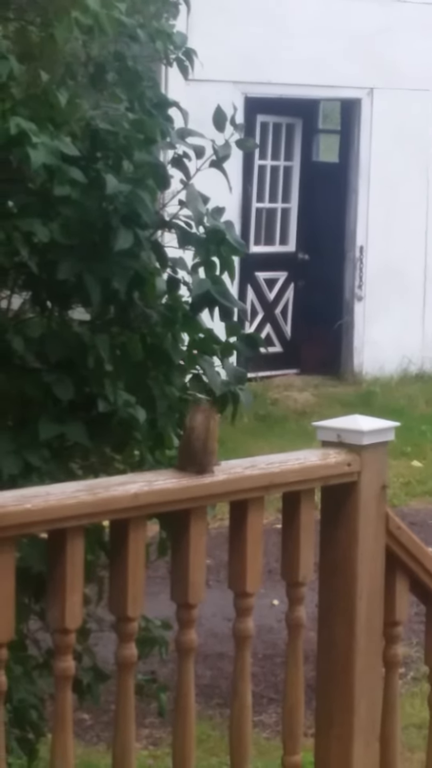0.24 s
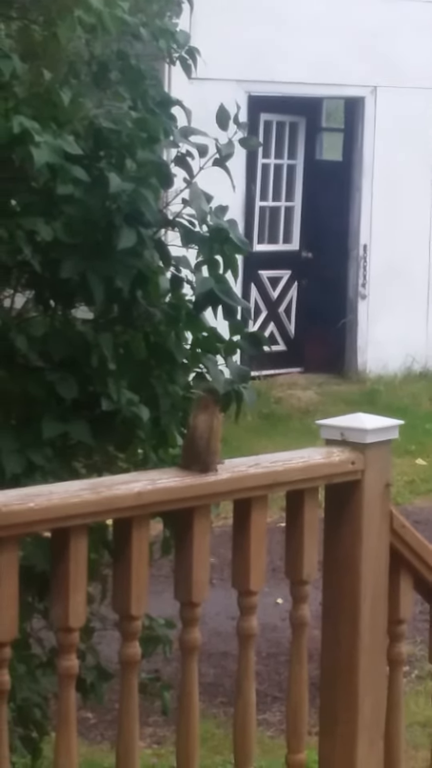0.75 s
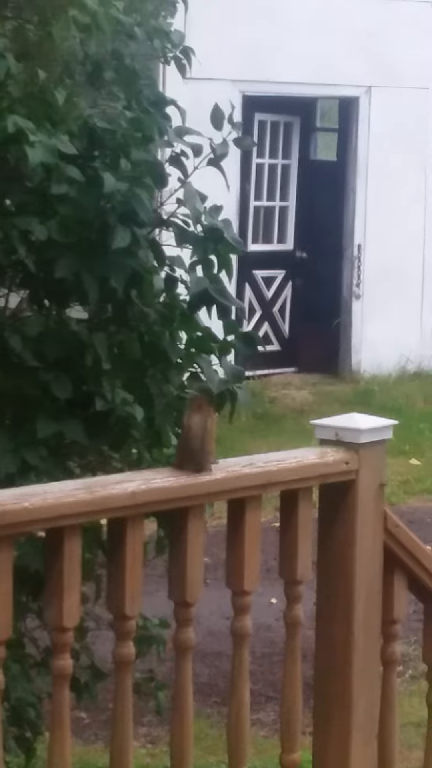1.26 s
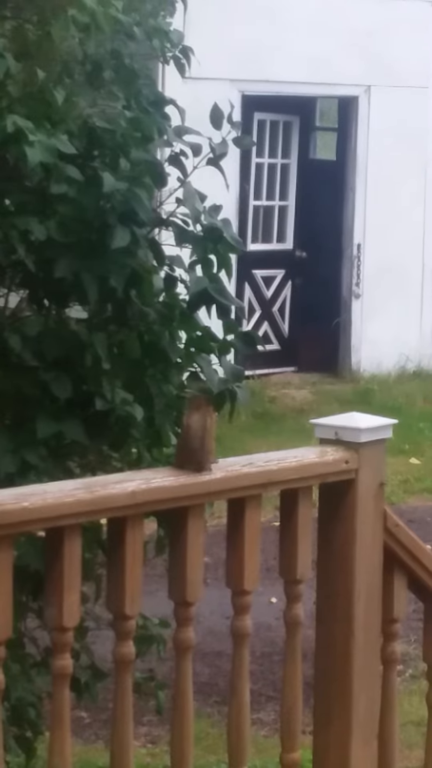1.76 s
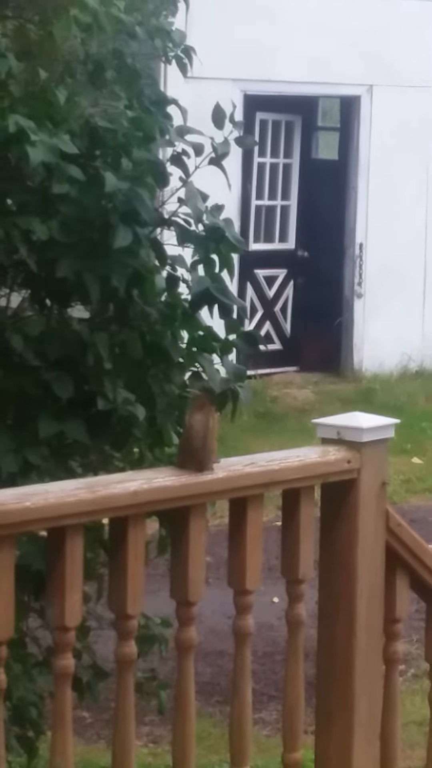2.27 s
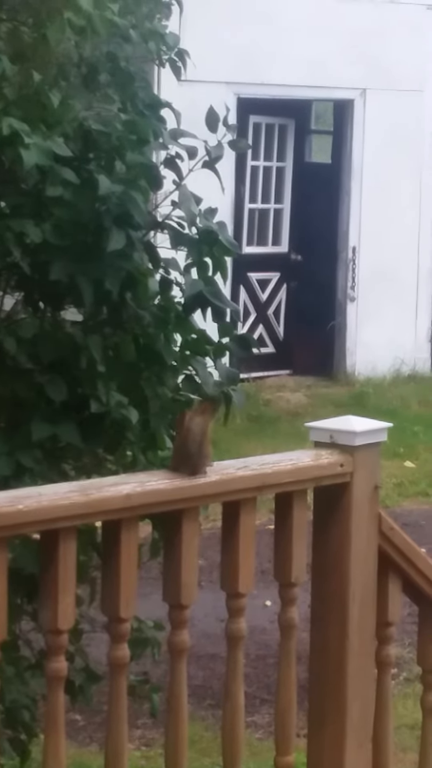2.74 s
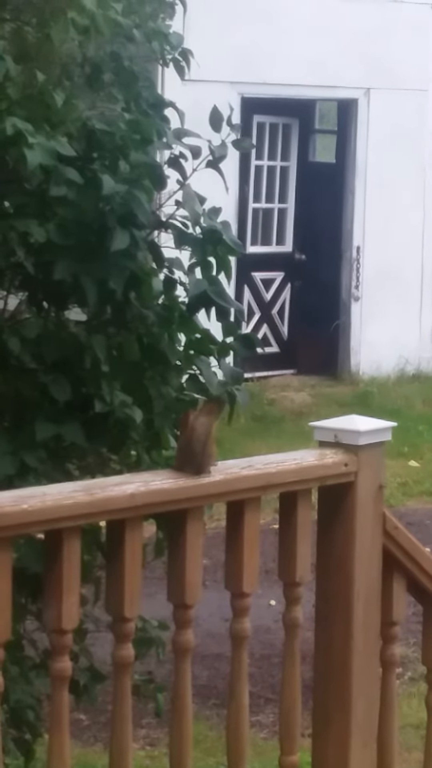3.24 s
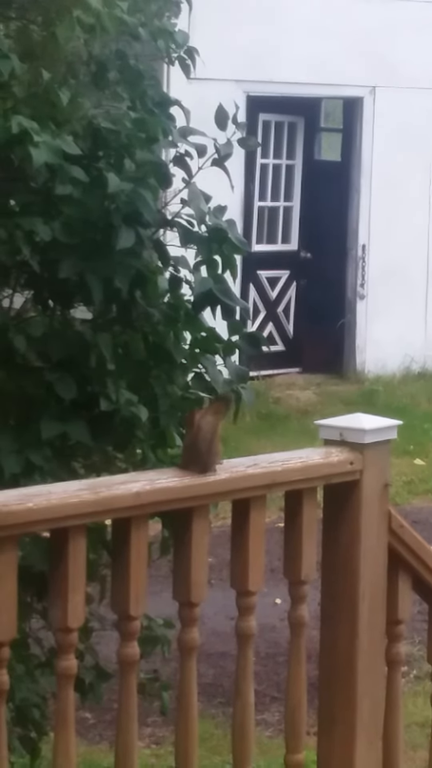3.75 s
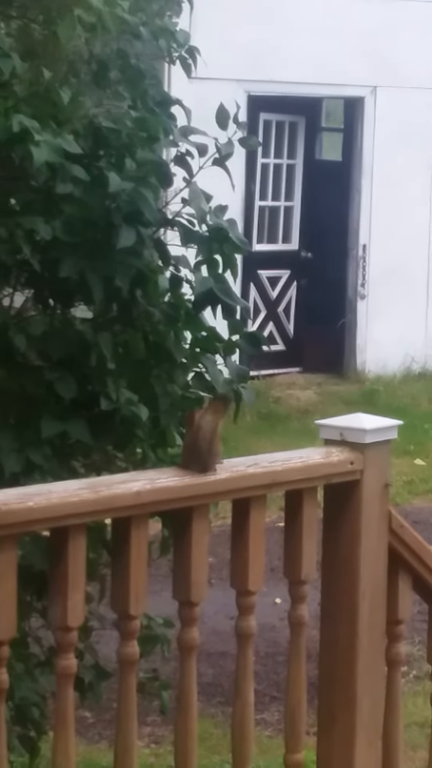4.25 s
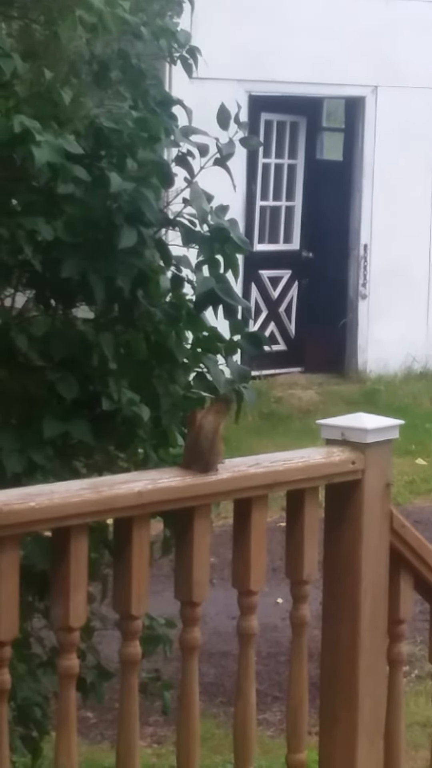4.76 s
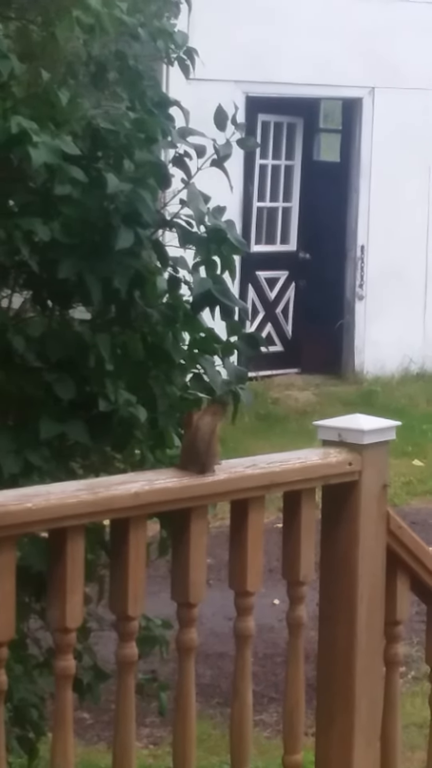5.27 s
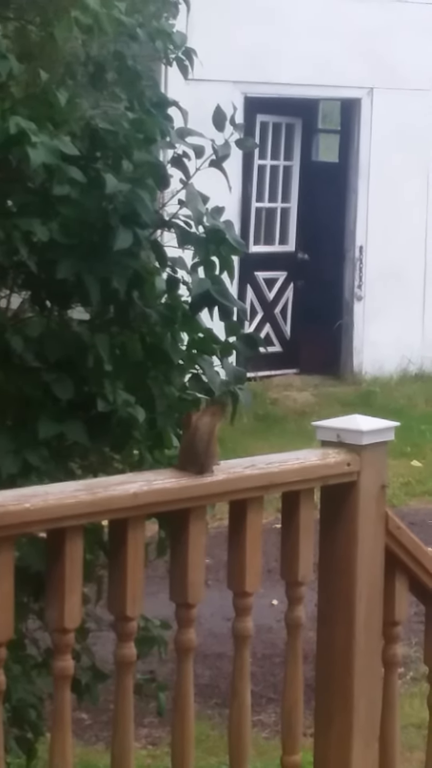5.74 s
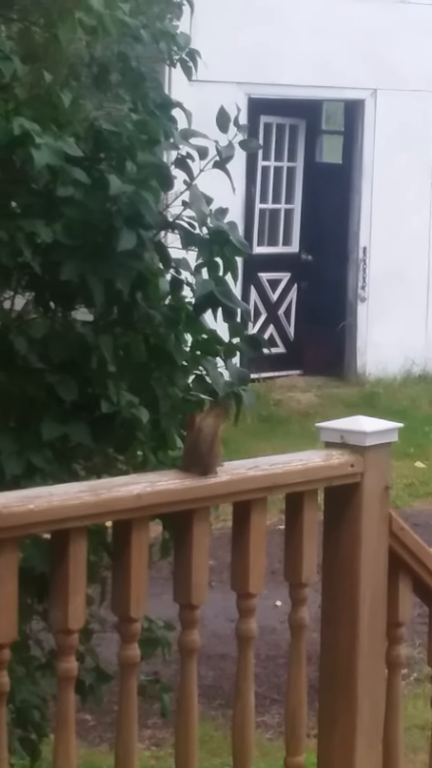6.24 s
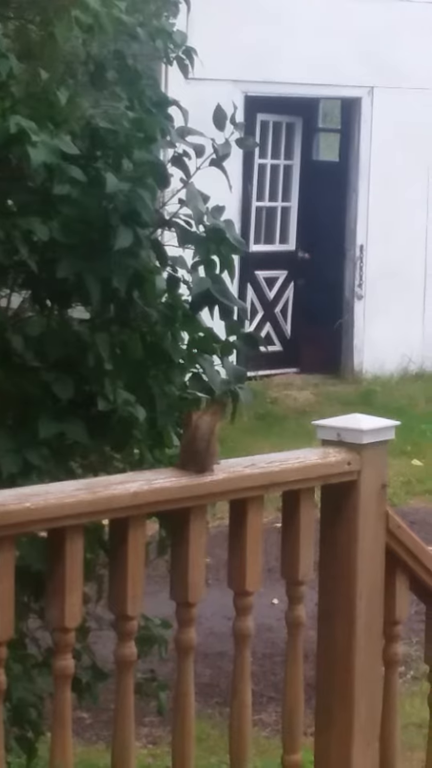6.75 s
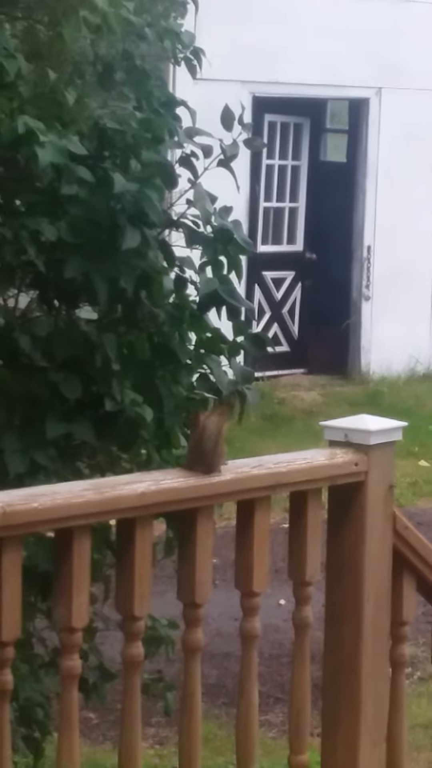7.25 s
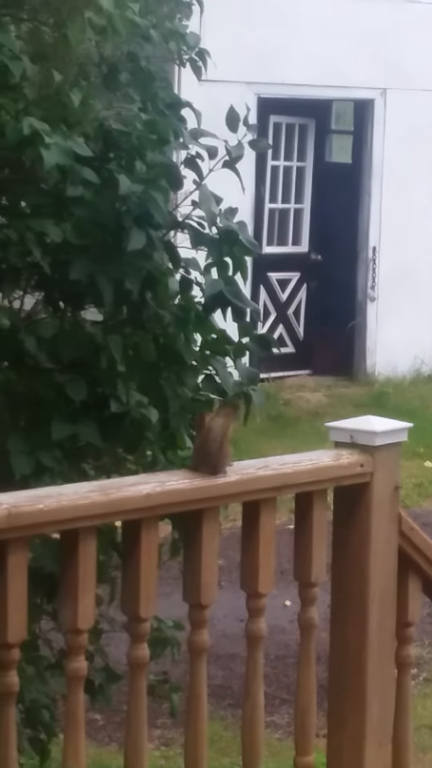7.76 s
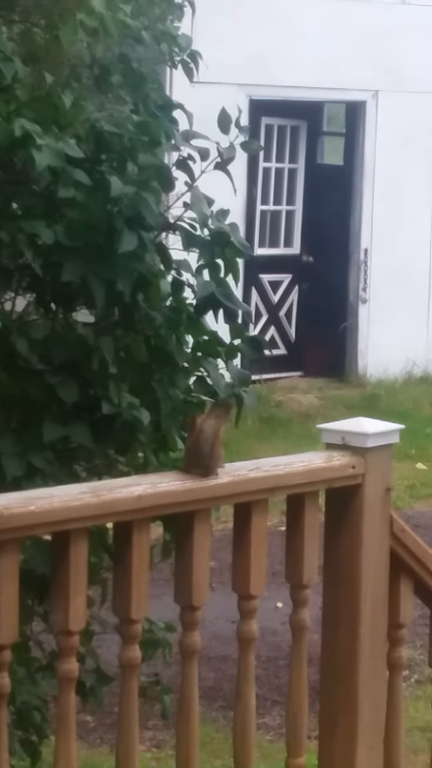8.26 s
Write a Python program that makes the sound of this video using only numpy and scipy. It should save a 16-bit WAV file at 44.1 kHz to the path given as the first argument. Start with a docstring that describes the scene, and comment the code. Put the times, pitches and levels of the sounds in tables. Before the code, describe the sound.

A small squirrel scolds outdoors by a wooden porch for the whole eight seconds or so. Its chirps are very short, high, arching whistles with a slight rasp, coming about three times a second at a fairly even level, each with a brief echo off the rail and house walls. One softer, lower squeak slips in at 0.6 seconds. From about 1.1 seconds, a quick, hoarse, breathy chuff follows some of the chirps. Sharp, dry knocks sound close to the microphone at about 0.7, 1.5 and 2.4 seconds, with the loudest at 3 seconds and a smaller one just after. They then thin out to light taps and scuffs while the chirping runs on to the end. Underneath, quiet and constant, are a high insect shimmer that gently swells, soft garden air and a faint low machine hum.

```python
"""A garden bed opens the scene and holds throughout: soft air, a high insect shimmer, a faint machine hum.
At once a small squirrel scolds from a wooden porch rail, in arched whistles that break upward and sag.
One softer squeak slips in, and from about a second on a hoarse, breathy chuff follows some of the chirps.
Sharp, close knocks peak around three seconds, then thin out to light taps and scuffs.
The scolding runs on to the end, with the porch and the house walls throwing each call back."""
import sys
import numpy as np
from scipy import signal
from scipy.fft import rfft, irfft
from scipy.io import wavfile

SR = 44100
rng = np.random.default_rng(int(sys.argv[2]) if len(sys.argv) > 2 else 0)


def put_to_file(sound):
    """Save the sound as 16-bit audio at rate SR, in the file named by the first command-line argument."""
    columns = np.atleast_2d(sound).T  # one column per channel
    safe = np.clip(columns, -1, 1)
    whole_steps = np.round(safe * 32767)
    wavfile.write(sys.argv[1], SR, whole_steps.astype(np.int16))


N = 374837

# tone of the garden air: (frequency [Hz], relative level [dB])
AIR_SPECTRUM = [(20, -40), (40, -16), (58, -3.5), (82, 7), (105, -1.5), (170, -6.5), (300, -11.5),
                (500, -16.5), (1000, -26), (2000, -35.5), (3500, -26), (8000, -23.5), (11000, -32),
                (16000, -27)]
# tone of the insect chorus: (frequency [Hz], relative level [dB])
INSECT_SPECTRUM = [(3700, -29.5), (4400, -15), (4800, -7), (5050, -1.5), (5350, 2.5), (5550, -5),
                   (5750, -9), (6500, -15.5), (7200, -20.5), (9000, -47)]
# partials of the machine hum: (frequency [Hz], rms level [dB])
HUM_PARTIALS = [(83.5, -80), (119.7, -67.5), (240, -81), (303, -75)]
# slaps off rail, posts and walls: (delay [s], gain [dB])
ECHO_TAPS = [(.0066, -12), (.0083, -13), (.0101, -6), (0.0118, -9), (.0218, -17.5), (0.0273, -11),
             (.0412, -13.5), (.102, -25)]
# ring-out of the porch: (frequency [Hz], t60 [s])
PORCH_DECAY = [(200, 0.51), (1000, 0.18), (3300, 0.21), (6300, 0.31), (13000, 0.28)]
# knock and scuff cues: (time [s], snap level [dB], body level [dB], body tuning [ratio],
# snap tuning [ratio], contact time [ratio])
KNOCK_CUES = [(0.2528, -49, -47.5, 0.53, 1.07, 1.55), (.476, -41, -55, 0.98, 0.87, 1.2),
              (0.6881, -24, -27.5, 1.065, 0.86, 0.53), (1.017, -53.5, -62.5, 0.84, 1.03, 1.9),
              (1.543, -30, -35, 1.054, 0.84, 0.54), (1.652, -40, -54.5, 0.68, 1.11, 0.79),
              (2.3447, -32.5, -70, 1.04, 1.05, 0.81), (2.417, -46.5, -58, 0.91, 1, 1.6),
              (2.4309, -35, -39, 0.66, 1.01, 0.9), (2.82, -50.5, -49, 1.28, 0.94, 3.2),
              (3.0209, -21.5, -35, .94, .97, 0.4), (3.0817, -34.5, -39, 1.14, 0.41, 0.39),
              (3.352, -34, -43.5, 1.28, 1.06, 0.62), (3.467, -54.5, -54.5, 1.12, 1.36, 1.3),
              (3.884, -61.5, -58, 1.3, 0.78, 1.8), (4.059, -41.5, -45.5, 1.24, 0.93, 1.8),
              (4.397, -58, -74, 0.57, 0.54, 1.2), (4.543, -48, -58, 1.9, 0.71, 1.4),
              (5.07, -43.5, -49.5, 1.72, 1.4, .62), (5.49, -46, -51.5, .63, 0.47, 2.74),
              (6.7236, -49.5, -49, 0.6, 0.85, 1.9), (8.255, -48, -55, 0.63, 1.23, .91)]
# tone of a knock's snap before tuning: (frequency [Hz], relative level [dB])
SNAP_SPECTRUM = [(70, -57), (300, -13), (800, -9.5), (1500, -4), (2300, -7), (3100, -1.5), (4000, 5.5),
                 (5200, -0.5), (7000, -6), (11000, -27)]
# tone of a knock's treble crack: (frequency [Hz], relative level [dB])
CRACK_SPECTRUM = [(3000, -71), (6500, -19), (8300, 11), (10500, -13.5), (13000, 0.5), (16000, -6.5)]
# modes of the knocked body before tuning: (frequency [Hz], relative level [dB], t60 [s])
BODY_MODES = [(243.6, -13, 0.081), (342.4, -16, 0.15), (513, -4, 0.056), (673.7, -3.5, 0.073),
              (695, 9.5, 0.021), (824, -11, 0.15), (902, -5, 0.022), (1062, -7, 0.042), (1378, 1, 0.025),
              (1578, -6.5, 0.025)]
# chuff cues: (time [s], length [s], level [dB], relative hiss level [dB])
CHUFF_CUES = [(1.101, 0.033, -39.5, -15), (1.476, 0.029, -40, 1), (2.258, 0.039, -40.5, -12),
              (2.912, 0.036, -38, -0.5), (3.599, 0.039, -37, -2.5), (4.46, 0.037, -38.5, 0),
              (5.224, 0.037, -38.5, -1), (5.959, 0.03, -39, -0.5), (6.403, 0.038, -38, -2),
              (7.625, 0.036, -40, 0.5)]
# tone of the throat in a chuff: (frequency [Hz], relative level [dB])
THROAT_SPECTRUM = [(300, -24.5), (600, -28.5), (900, -17.5), (1400, -36.5), (2300, -19), (2850, -0.5),
                   (3600, 1), (4500, -14), (7000, -9.5), (10800, -28.5), (16000, -36)]
# air hissing past the teeth: (frequency [Hz], relative level [dB])
TEETH_SPECTRUM = [(2000, -17.5), (4500, -15), (8000, -6), (10800, -7), (12000, -1), (12700, 4.5),
                  (14200, -12.5), (16000, -8)]
# chirp cues: (time [s], length [s], top pitch [Hz], level [dB])
CHIRP_CUES = [ (0.022, 0.043, 6605, -29.5), (.3803, .038, 6700, -28), (0.8715, 0.037, 6660, -27.5),
              (1.432, 0.04, 6660, -29.5), (1.854, 0.056, 6653, -29), (2.1067, 0.028, 6675, -27.5),
              (2.5434, 0.043, 6714, -27.5), (2.874, 0.032, 6715, -28), (3.253, 0.042, 6740, -28),
              (3.563, .034, 6740, -26.5), (4.02, 0.041, 6780, -26.5), (4.428, .031, 6720, -27.5),
              (4.8547, 0.038, 6790, -25.5), (5.1911, 0.031, 6510, -26.5), (5.5987, 0.039, 6614, -25.5),
              (5.9183, .032, 6640, -27), (6.361, 0.036, 6650, -25.5), (6.769, .035, 6650, -25),
              (7.001, 0.032, 6780, -26.5), (7.3047, 0.039, 6646, -27), (7.582, .035, 6670, -27.5),
              (7.883, 0.033, 6580, -27), (8.1448, .039, 6760, -27)]


def amp(db):
    """Decibels to gain."""
    return 10 ** (np.asarray(db) / 20)


def unit(x):
    """Scales to rms 1."""
    return x / np.sqrt(np.mean(x ** 2) + 1e-20)


def curve_at(points, hz):
    """Reads a curve along a log-frequency axis."""
    f, value = np.transpose(points)
    return np.interp(np.log(hz + 1), np.log(f + 1), value)


def add(mix, start_s, sound):
    """Drops a sound into the mix at its cue."""
    part = mix[max(round(start_s * SR), 0):][:len(sound)]
    part += sound[:len(part)]


def noise(spectrum, size, tuning=1):
    """Noise coloured by a spectrum, transposed by a ratio."""
    hz = np.fft.rfftfreq(size, 1 / SR)
    return unit(irfft(rfft(rng.standard_normal(size)) * amp(curve_at(spectrum, hz / tuning)), size))


def drift(rate_hz, size):
    """Smooth random modulation of rms 1, rolling off above the given rate."""
    hz = np.fft.rfftfreq(size, 1 / SR)
    return unit(irfft(rfft(rng.standard_normal(size)) * np.exp(-(hz / rate_hz) ** 2) * (hz > 0), size))


def garden(air_db=-63, insects_db=-55.5, throb_db=1.4, swell_db=2.8):
    """The bed: still air, an insect chorus that throbs and swells, a wavering machine hum."""
    t = np.arange(N) / SR
    shimmer = amp(insects_db + throb_db * drift(82, N) + swell_db * drift(1.3, N))
    insects = shimmer * noise(INSECT_SPECTRUM, N)
    hum = sum(amp(db) * np.sqrt(2) * np.sin(2 * np.pi * hz * t + 0.19 * drift(2.0, N))
              for hz, db in HUM_PARTIALS)
    return amp(air_db) * noise(AIR_SPECTRUM, N) + insects + hum


def porch(send, build_s=0.0047, yard_db=-17, yard_t60=0.44, tails=3):
    """Reverb: dense porch scatter and a faint yard tail; slow crossfades keep the paths shifting."""
    wet = np.zeros(N)
    build = 1 - np.exp(-np.arange(SR) / SR / build_s)
    for k in range(tails):
        hz, t, bands = signal.stft(rng.standard_normal(SR), SR, nperseg=256)
        decay = amp(-60 * t / curve_at(PORCH_DECAY, hz)[:, None]) + amp(yard_db - 60 * t / yard_t60)
        tail = signal.istft(bands * decay, SR, nperseg=256)[1][:SR] * build
        crossfade = np.cos(np.pi * (np.arange(N) / SR / 2 + k / tails)) * np.sqrt(2 / tails)
        wet += signal.fftconvolve(send * crossfade, tail / np.linalg.norm(tail))[:N]
    return wet


def echoes(send):
    """Early reflections off the nearby woodwork and walls."""
    wet = np.zeros(N)
    for delay, db in ECHO_TAPS:
        add(wet, delay, amp(db) * send)
    return wet


def ticks(per_s=1.0, level_db=-65, spread_db=2.5):
    """A sprinkle of tiny knocks at random moments, each with its own weight and pitch."""
    track = np.zeros(N)
    for when, strength, octave in rng.uniform(-1, 1, (round(per_s * N / SR), 3)):
        db = level_db + spread_db * strength
        add(track, abs(when) * N / SR, knock(db, db, 2 ** octave, snap_tuning=0.83, contact=1.2))
    return track


def knock(snap_db, body_db, body_tuning, snap_tuning, contact, body_rise_s=0.0016, size=8192):
    """A snap and a bright crack over a hollow ring; longer contact softens the blow into a scuff."""
    t = np.arange(size) / SR
    stretched = t / contact
    attack = 1 - np.exp(-stretched / contact ** 2 / 0.0001)
    spike = 1 + np.exp(-stretched / 0.00089)  # the first instant of contact hits hardest
    snap = amp(snap_db - 60 * stretched / 0.07) * noise(SNAP_SPECTRUM, size, snap_tuning)
    crack_db = snap_db - 11.5 + 11 * np.log2(body_tuning)  # higher knocks crack more
    crack = amp(crack_db - 60 * stretched / 0.051) * noise(CRACK_SPECTRUM, size)
    body = sum(amp(body_db + db - 60 * t / t60)
               * np.sin(2 * np.pi * (hz * body_tuning * t + rng.random()))
               for hz, db, t60 in BODY_MODES)
    return (snap + crack) * attack * spike + body * (1 - np.exp(-t / body_rise_s))


def chuff(length, level_db, hiss_db, rough_db=3.5, squeak_hz=890, wheeze_hz=1150, size=4096):
    """Breath through a hoarse throat and past the teeth, with a faint rising squeak and a late wheeze."""
    progress = np.arange(size) / SR / length
    throat_env = np.interp(progress, [0, 0.22, 0.6, 0.85, 1.1], [0, 0.5, 1, 1, 0.054])
    teeth_env = np.interp(progress, [0, 0.2, 0.65, 1.1], [0, 0.49, 1, 0])
    wheeze_env = np.exp(-((progress - 0.75) / 0.14) ** 2)
    waver = 1 + 0.056 * drift(330, size)
    scoop = 1 - 0.407 * np.exp(-progress / 0.2505)
    phase = 2 * np.pi * np.cumsum(squeak_hz * scoop * waver) / SR
    squeak = amp(-14) * teeth_env * (np.sin(phase) + amp(-2) * np.sin(2 * phase))
    wheeze = amp(-12) * wheeze_env * np.sin(2 * np.pi * np.cumsum(wheeze_hz * waver) / SR)
    breath = throat_env * noise(THROAT_SPECTRUM, size)
    hiss = amp(hiss_db) * teeth_env * noise(TEETH_SPECTRUM, size)
    grit = amp(rough_db * drift(380, size))
    return amp(level_db) * (grit * (breath + hiss) + squeak + wheeze)


def chirp(length, top_hz, level_db, break_s=0.0033, crescendo_db=14, low_tuning=1, size=4096):
    """A whistle that breaks from a low register into a high arch; mid-call, period doubling adds rasp."""
    attack_s, settle_s, sag_s = 0.004, 0.0064, 0.00423
    throat_hz, throat_width_hz, flare_db = 5993, 236, 8
    t = np.minimum(np.arange(size) / SR, length)
    progress = t / length
    high = 0.5 + 0.5 * np.tanh((t - break_s) / 0.00035)  # crossfade across the register break
    low = 1 - high
    low_hz = low_tuning * np.interp(t, [0, break_s], [2785, 3764])
    scoop = 1 - 0.1844 * np.exp((0.0033 - t) / settle_s)  # the high register lands flat, then lifts
    sag = np.exp((t - length) / sag_s)  # pitch and level fall as the pressure gives out
    arch = scoop * (1 - 0.372 * sag)
    jitter = 1 + 0.006 * drift(280, size)
    hz = (low * low_hz + high * top_hz * arch / arch.max()) * jitter
    phase = 2 * np.pi * np.cumsum(hz) / SR
    whistle = np.sin(phase) + amp(-27 * high - 12 * low) * np.sin(2 * phase)
    rasp_db = -20 + 0.0206 * (top_hz - 6650)  # higher calls rasp more
    rasp_env = amp(rasp_db) * np.exp(-((progress - 0.52) / 0.17) ** 2) * drift(230, size)
    rasp = rasp_env * (np.sin(phase / 2) + amp(-12) * np.sin(1.5 * phase))
    gate = np.minimum(t / attack_s, 1) * np.minimum((1 - progress) / 0.13, 1)
    effort_db = 2 + crescendo_db * (progress - 1) - 1.5 * low - 4 * sag
    flutter_db = 3 * drift(207, size)
    # the whistle flares as it sweeps through the throat's resonance
    throat_db = flare_db * np.exp(-((hz - throat_hz) / throat_width_hz) ** 2)
    return (whistle + rasp) * gate * amp(level_db + effort_db + flutter_db + throat_db)


def scene():
    """Mono mix: the squirrel up front with its echoes, the knocks close and drier, the bed beneath."""
    calls, knocks = np.zeros(N), np.zeros(N)
    for start_s, *cue in CHIRP_CUES:
        add(calls, start_s, chirp(*cue))
    # one softer, lower squeak, slow to break upward
    squeak = chirp(0.018, top_hz=5520, level_db=-33.5, break_s=0.0052, crescendo_db=2.5, low_tuning=0.93)
    add(calls, 0.6165, squeak)
    for start_s, *cue in CHUFF_CUES:
        add(calls, start_s, chuff(*cue))
    for start_s, *cue in KNOCK_CUES:
        add(knocks, start_s, knock(*cue))
    squirrel = amp(-1.5) * calls
    reverb = porch(squirrel + amp(-11) * knocks)
    return (squirrel + echoes(squirrel) + knocks + reverb + garden() + ticks())[None]


def record(dry):
    """A steep high cut takes the very top off the mix."""
    high_cut = signal.firwin(511, 15850, window=("kaiser", 9), fs=SR)
    return signal.oaconvolve(dry, high_cut[None], "same")


dry = scene()
out = record(dry)
put_to_file(out)
```